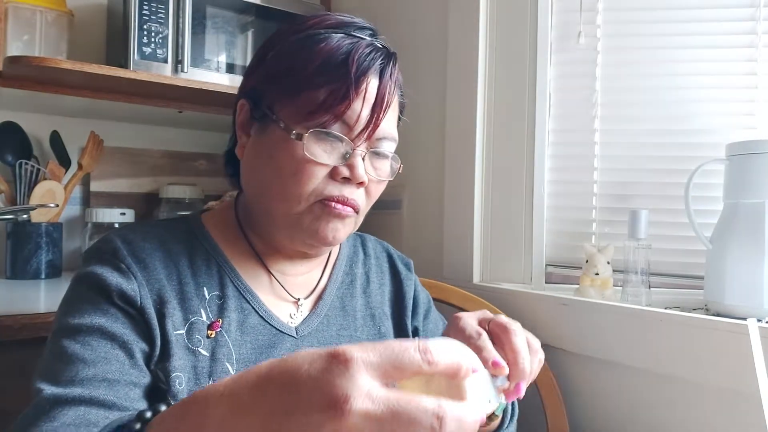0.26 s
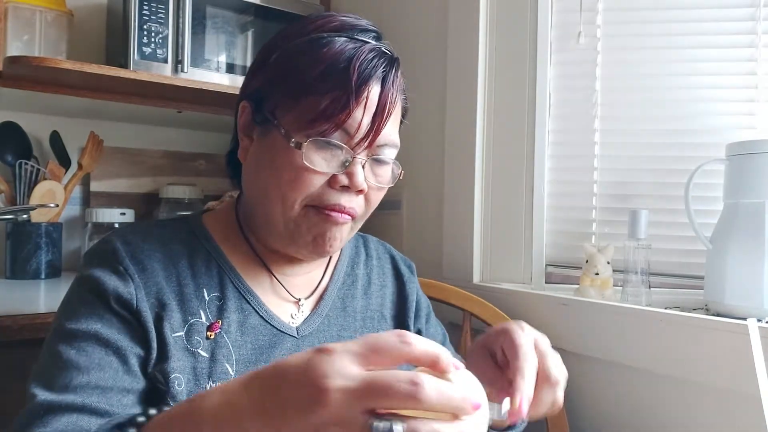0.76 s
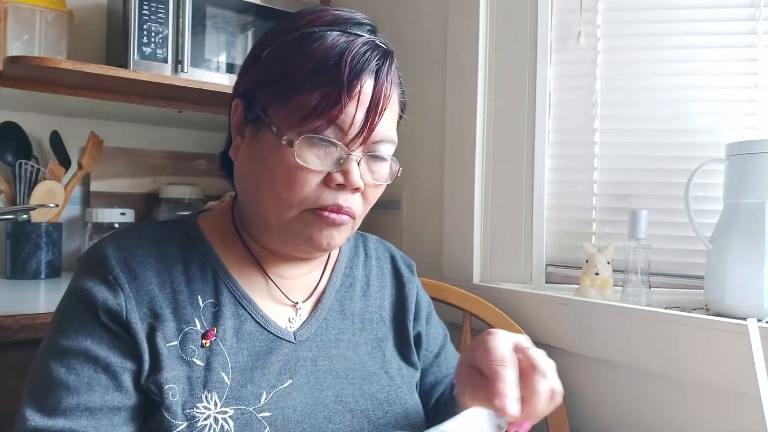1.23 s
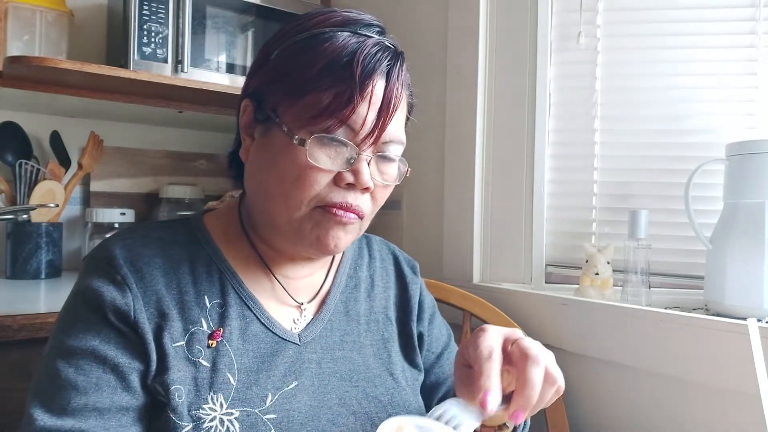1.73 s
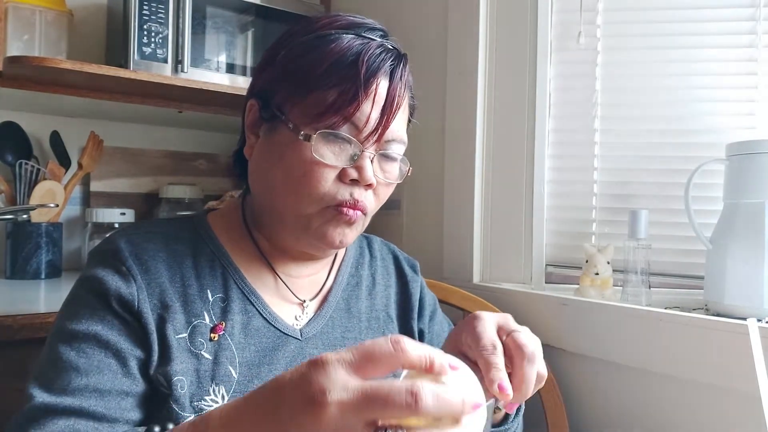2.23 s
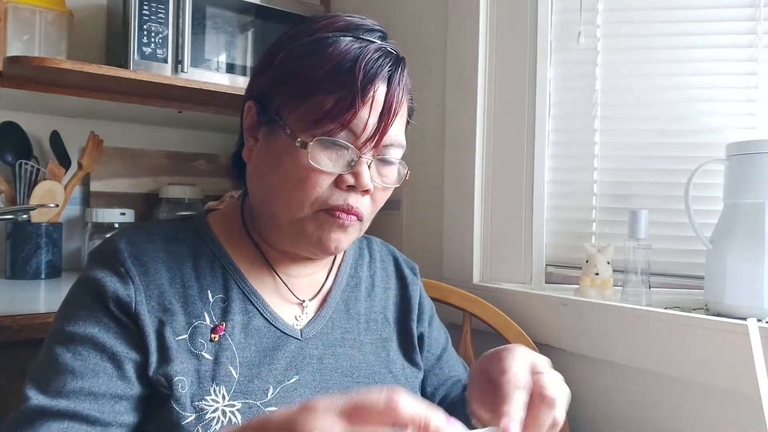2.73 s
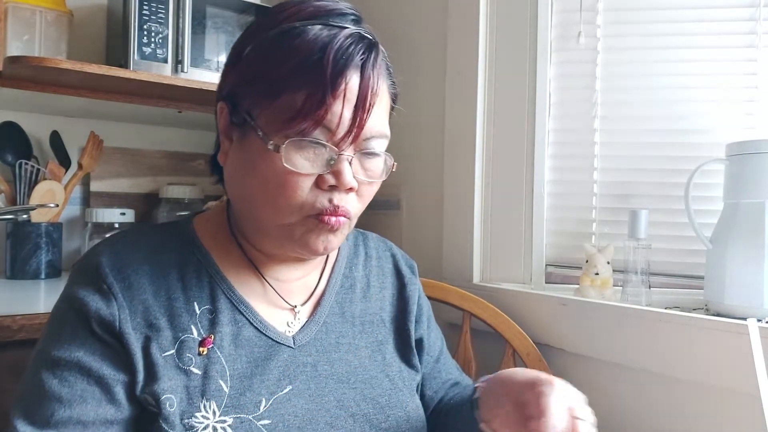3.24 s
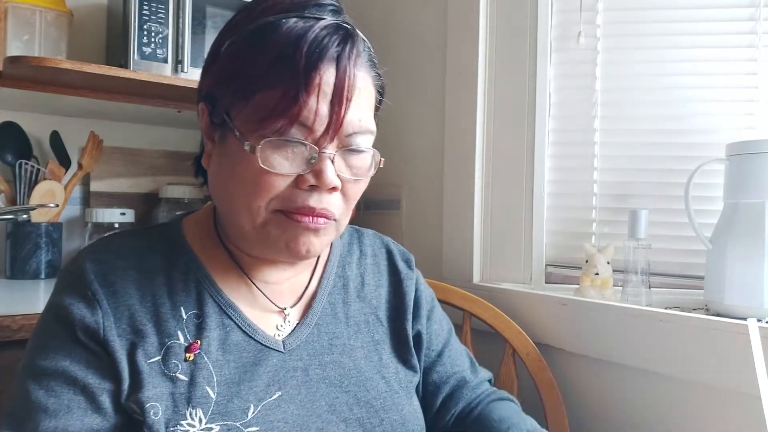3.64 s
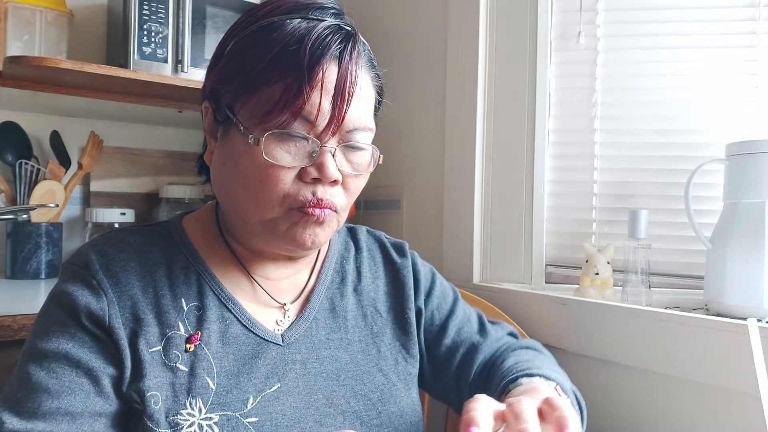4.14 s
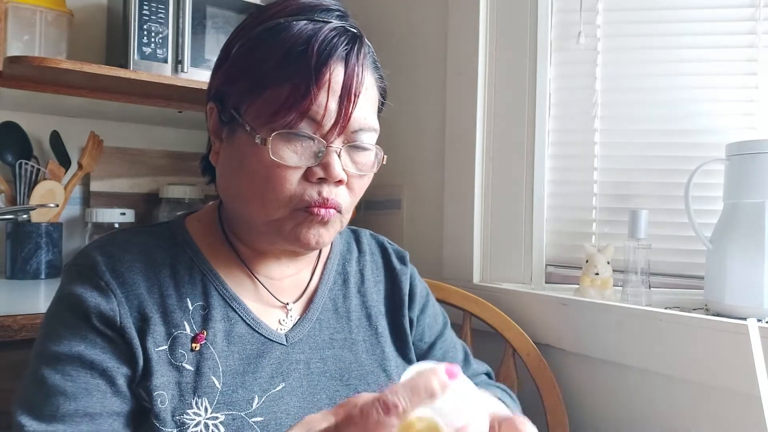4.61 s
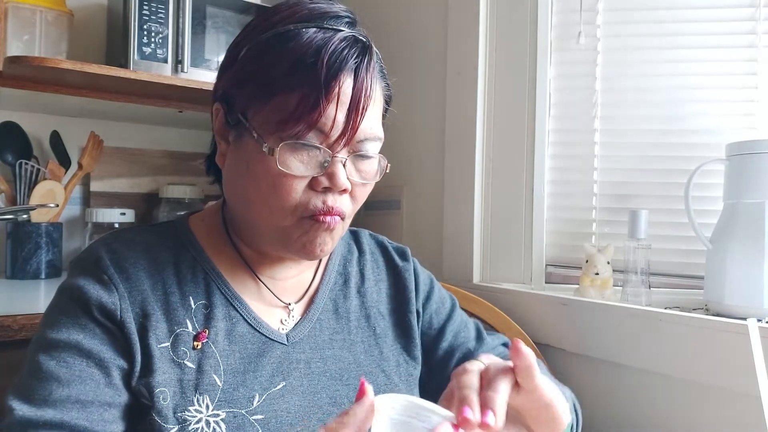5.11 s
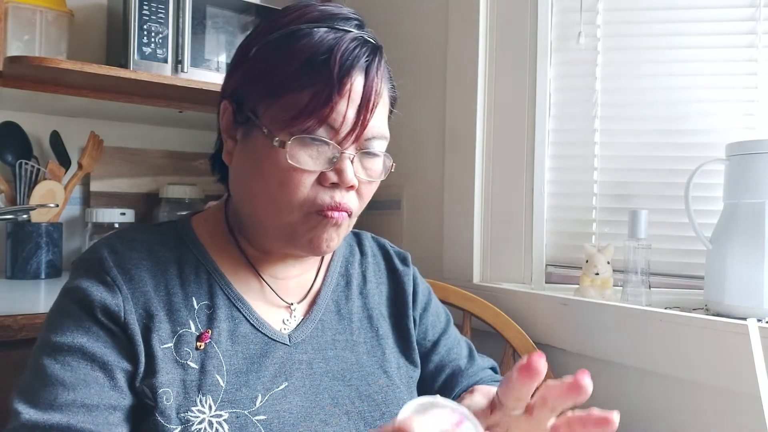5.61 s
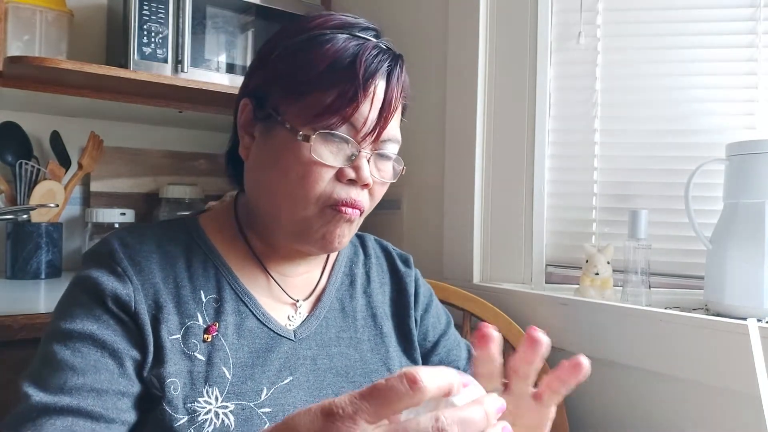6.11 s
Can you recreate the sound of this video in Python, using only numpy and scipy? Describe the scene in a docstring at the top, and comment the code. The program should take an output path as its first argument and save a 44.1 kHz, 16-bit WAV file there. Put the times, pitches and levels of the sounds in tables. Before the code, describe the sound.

Over a steady low room hum, fingertips scrape lightly on a plastic cup, its lid ticking now and then, with a barely audible bump on the table. The handling thins out before a fork is set down with a sudden hard clack, a second strike and a brief chattering rattle, leaving a short room echo. Quiet rubs and ticks follow, ending in closer, brisker plastic scuffs. Near microphones, indoors.

```python
"""A quiet kitchen: hands work at a small plastic cup. Fingertips rub and flex it (noise through moving
resonances), palms scuff it, the lid ticks (short decaying tones) and a hand bumps the table.
A steel fork is set down; it bounces, rattles and rings (noise cracks and dying modes).
A pair of microphones hears it with the kitchen's echo, over a low room hum with fuzzy tones."""
import sys
import numpy as np
from scipy import signal
from scipy.fft import rfft, irfft
from scipy.io import wavfile
from scipy.ndimage import uniform_filter1d

SR = 44100
rng = np.random.default_rng(int(sys.argv[2]) if len(sys.argv) > 2 else 0)


def store_pcm(level_fs):
    """Save levels as 16-bit WAV."""
    pcm = np.round(np.clip(level_fs, -1, 1) * 32767).astype(np.int16)
    wavfile.write(sys.argv[1], SR, np.atleast_2d(pcm).T)


N = 280608  # samples

# modes of the table top: f/Hz
TOP_HZ = [306, 382, 467, 504, 560, 609, 777, 1073, 1628]
# strength and decay of those modes: relative level/dB, t60/s
TOP_MODES = [(2, 0.11), (3, 0.13), (-1, 0.22), (-7, 0.055), (-4.5, .08), (-9, 0.024), (-3, 0.063),
             (-15, 0.07), (-10.5, 0.025)]
# spectrum of steel striking the table, relative: f/Hz, density/dB per Hz
CRACK_COLOUR = [(250, -26.5), (550, -8.5), (850, -7), (1150, -7.5), (1620, -2.5), (2100, -3), (2750, 0),
                (3100, -6.5), (3600, 1.5), (4300, -3), (5300, -4), (7200, -6), (9000, -14), (11500, -24),
                (14300, -8.5), (16000, -12)]


def rub():
    """Skin drags over plastic and shakes the resonances of the cup; the wall's pitch moves with the grip."""
    # fingertip strokes: start/s, rise/s, hold/s, fall/s, pressure/dB, rim/dB and dry fizz/dB
    # (both relative to pressure), wall f/Hz
    rubs = [(0.0, 0.0056, 0.0041, .1, -72, -26, -5.5, 2620),
            (0.071, 0.0018, 0.0024, .07, -63.5, 2, 4.5, 2300), (0.087, 0.036, .01, 0.42, -70, -7, -6, 2420),
            (0.141, 0.087, 0.11, 0.35, -72.5, -0.5, 5, 2520),
            (0.41, 0.043, 0.0069, 0.073, -63.5, -3, 4.5, 2510),
            (0.466, 0.034, 0.1, 0.16, -80, -2.5, 3.5, 2350),
            (1.431, 0.0018, 0.015, 0.2, -72, -0.5, 5, 2460), (1.45, 0.098, 0.016, 0.33, -64, -3, 3.5, 2430),
            (1.816, 0.018, 0.006, 0.032, -60.5, -3.5, -3, 2510),
            (1.843, 0.026, 0.039, 0.091, -66, -6, 1.5, 2520),
            (2.046, 0.0024, .005, 0.05, -67, -23, 1.5, 2500),
            (2.051, 0.061, 0.028, 0.079, -69.5, -0.5, 4, 2400),
            (2.196, 0.022, 0.019, 0.12, -70.5, 4.5, 9, 2300),
            (2.296, 0.03, 0.0079, 0.052, -63.5, -1, 8, 2360),
            (2.32, 0.053, 0.044, 0.12, -67.5, -1.5, -2.5, 2540),
            (2.427, 0.059, 0.021, 0.21, -63, -1, 1, 2370),
            (2.565, 0.065, 0.0086, .14, -76, 5.5, 10.5, 2310),
            (2.753, 0.041, 0.034, .1, -89.5, -1, 2, 2350), (3.275, 0.061, 0.018, 0.094, -82, -1, -3, 2620),
            (3.39, 0.0075, .01, 0.25, -93, 7, -9, 2450), (4.135, 0.054, 0.021, 0.33, -71.5, 3.5, 6.5, 2470),
            (4.257, 0.091, .09, .3, -73, -2.5, 4.5, 2530),
            (4.453, 0.074, 0.063, 0.53, -76, -2.5, 6.5, 2340),
            (4.741, 0.0089, 0.013, .1, -87.5, 2, 12, 2310), (4.77, 0.074, .02, 0.34, -86, 3, 19.5, 2150),
            (4.848, 0.07, 0.037, 0.18, -78, 3.5, 14.5, 2340),
            (4.951, 0.059, 0.14, 0.26, -81.5, 4.5, 18.5, 2400),
            (5.205, 0.057, 0.016, 0.22, -83, 9.5, 14, 2400), (5.31, 0.073, 0.052, .1, -85, 5.5, 11.5, 2370),
            (5.436, 0.03, 0.018, 0.24, -69, -0.5, 3.5, 2610),
            (5.468, 0.024, 0.01, 0.032, -55, -11.5, -8, 2420), (5.68, .004, .01, 0.085, -85.5, 1, 17, 2390),
            (5.764, 0.069, 0.033, 0.094, -59.5, -4, 0.5, 2430),
            (6.012, 0.0018, 0.023, 0.11, -84.5, 5, 17, 2330),
            (6.037, 0.056, 0.031, 0.092, -58, -4, -0.5, 2430),
            (6.083, 0.0051, 0.031, .03, -53, -9.5, -5, 2650), (6.321, .002, 0.02, .1, -57.5, -8, -2, 2710),
            (6.322, 0.038, .02, 0.082, -50.5, -3, -2.5, 2600)]
    # fixed resonances of the cup: f/Hz, width/Hz of each filter pass, level/dB, share (1 rim, 2 fizz)
    cup = [(4306, 930, 2.5, 1), (5300, 1100, 0, 1), (7220, 2780, -4.5, 2), (11130, 4100, 0, 2),
           (12100, 6300, -1.5, 2)]
    power = strokes(rubs)
    rim_db, fizz_db, wall_hz = np.transpose(rubs)[5:]
    pressure = spread(np.sqrt(power.sum(0)))
    rim = spread(np.sqrt(gain_of(2 * rim_db) @ power))
    fizz = spread(np.sqrt(gain_of(2 * fizz_db) @ power))
    shares = (pressure, rim, fizz)
    drag = slips(N, 4.55, hold=40)
    # overlapping strokes agree on a wall pitch, weighted by power
    wall = spread(wall_hz @ power / power.sum(0))
    body = -pressure * evened(resonate_twice(drag, wall, 690))
    for n, (hz, width, db, share) in enumerate(cup):
        polarity = (-1) ** n
        body += polarity * shares[share] * gain_of(db) * evened(resonate_twice(drag, hz, width))
    return body


def scuff():
    """Coarser slips sound the air held between palm and cup."""
    # duller strokes, pitched by how the hand closes over the cup:
    # start/s, rise/s, hold/s, fall/s, level/dB, hollow f/Hz
    scuffs = [(0.0, .01, .01, 0.068, -88, 800), (0.068, .003, .005, .07, -83, 1430),
              (0.088, 0.026, 0.012, .1, -78, 1280), (0.188, .12, 0.056, .2, -76.5, 1180),
              (0.413, 0.05, .07, 0.2, -72, 605), (1.322, .012, 0.022, 0.41, -69.5, 950),
              (1.484, 0.064, 0.06, 0.18, -74, 1650), (1.825, 0.011, 0.072, 0.14, -74, 1650),
              (2.126, .003, 0.017, 0.67, -71, 1660), (2.27, 0.077, 0.024, .3, -68, 1400),
              (2.4, 0.09, 0.077, 0.23, -71.5, 1830), (3.297, 0.026, 0.038, 0.13, -71, 920),
              (4.275, .1, .025, .12, -67.5, 1550), (4.4, 0.027, 0.19, 0.16, -78, 1510),
              (5.308, 0.03, 0.027, 0.19, -68, 1030), (5.461, 0.0081, 0.03, 0.11, -65, 1524),
              (5.773, .004, 0.0096, .08, -75, 1210), (5.778, 0.031, 0.033, 0.096, -66, 1410),
              (5.84, 0.012, 0.019, 0.017, -53, 1700), (6.024, 0.078, 0.0087, 0.04, -58, 1560),
              (6.112, .006, 0.018, 0.028, -59, 1820), (6.321, 0.0017, 0.015, 0.15, -64, 1450),
              (6.322, 0.036, .02, .1, -55.5, 1150)]
    power = strokes(scuffs)
    hz = spread(np.transpose(scuffs)[5] @ power / power.sum(0))
    hollow = resonate_twice(slips(N, 6.1, hold=90), hz, 820)
    return spread(np.sqrt(power.sum(0))) * evened(hollow)


def add_ticks(mix):
    """The lid ticks: a bright snap of tone and noise, with a longer knock."""
    # time/s, snap level/dB, snap f/Hz, knock level/dB, knock f/Hz, left-right difference/dB
    ticks = [(0.0748, -43, 7450, -61.5, 2070, -19), (0.122, -46.5, 2250, -75, 2100, 7),
             (0.139, -51.5, 9100, -85, 1960, -11), (0.4517, -48, 2440, -76, 2130, -3),
             (0.8067, -66, 11100, -97, 1500, 4), (1.4362, -58, 7800, -68, 990, -10),
             (1.8194, -60, 5900, -68, 1516, -10), (1.834, -47, 1796, -76, 1850, 3),
             (1.8473, -46, 4160, -63, 1950, -16), (2.0492, -56.5, 4970, -74, 1560, -26),
             (2.1281, -52, 4900, -52.5, 1797, -0.5), (2.22, -50, 7500, -75, 4800, 0),
             (2.3277, -45, 6470, -72, 4770, 0), (3.2776, -70, 4270, -69, 4350, -8),
             (3.4093, -79, 4200, -65, 4750, 0), (3.4458, -76, 4200, -57, 1140, -5),
             (4.521, -51, 2350, -62, 1580, -14), (4.7514, -70, 7010, -71.5, 5540, -2),
             (5.686, -57, 5970, -71, 1323, -3), (5.7744, -78.5, 2410, -53, 1210, -1),
             (5.783, -72, 2300, -70, 2240, 0), (5.8037, -60, 4700, -59, 2430, -5),
             (6.0136, -62, 6500, -65, 1545, -1), (6.0449, -53, 2280, -56, 1425, 0),
             (6.095, -54, 2700, -47, 1790, -1.5), (6.32, -47, 1710, -52, 1620, 2)]
    t = np.arange(2500) / SR
    for s, db, hz, knock_db, knock_hz, pan_db in ticks:
        puff = np.diff(rng.standard_normal(len(t)), prepend=0)  # treble-heavy noise
        snap = np.sin(2 * np.pi * hz * t) + 0.56 * puff
        snap *= gain_of(db - 60 * t / 0.0063)
        knock = gain_of(knock_db - 60 * t / 0.037) * np.sin(2 * np.pi * knock_hz * t)
        add(mix, s, snap + knock, pan_db)


def add_bumps(mix):
    """A hand bumps the table and sets the modes of its top ringing."""
    bumps = [(0.479, -64.5), (2.128, -68.5), (6.111, -69.5), (6.344, -59)]  # time/s, level/dB
    t = np.arange(SR // 4) / SR
    for s, db in bumps:
        modes = ring(TOP_HZ, TOP_MODES, t, rng.random((3, 20)), split_hz=3.1)
        add(mix, s, gain_of(db) * modes * np.minimum(t / 0.0023, 1))


def hands():
    """All strokes, lid ticks and bumps, with their bounce off the table top."""
    mix = np.zeros((2, N))
    add(mix, 0, rub() + scuff(), pan_db=-2.3)
    add_ticks(mix)
    add_bumps(mix)
    # the bounce travels 5 cm further, so the first dip falls at 3.4 kHz
    late = np.exp(-1j * np.pi * np.fft.rfftfreq(N, 1 / SR) / 3400)
    return irfft(rfft(mix) * (1 + 0.1 * late), N)


def crack(t, db, tilt_db):
    """Burst of spiky noise as steel strikes the table; the tilt in dB per octave sets its brightness."""
    puff = rng.standard_normal(len(t))
    puff *= abs(puff)  # a few hard contacts stand out
    colour = [(hz, level + tilt_db * np.log2(hz / 3000)) for hz, level in CRACK_COLOUR]
    return gain_of(db - 60 * t / 0.028) * evened(coloured(puff, colour))


def clack(t, ring_db):
    """The hard point of contact gives a few short tones."""
    tones = [(1603, 1.5, .03), (1154, -1.5, .03), (2050, -2.5, 0.0083)]  # f/Hz, level/dB relative to the steel ring, t60/s
    return sum(gain_of(ring_db + level - 60 * t / t60) * np.sin(2 * np.pi * hz * t)
               for hz, level, t60 in tones)


def table_knock(t, knock_db, luck):
    """The blow rings the table top; a softer knock is duller."""
    soft_tilt, hard_knock_db = .4, -32  # dB per octave for each dB under a hard knock
    octaves = np.log2(np.divide(TOP_HZ, TOP_HZ[0]))
    tilt = soft_tilt * min(knock_db - hard_knock_db, 0) * octaves
    felt = [(level + dull_db, t60) for (level, t60), dull_db in zip(TOP_MODES, tilt)]
    return gain_of(knock_db) * ring(TOP_HZ, felt, t, luck, split_hz=39) * np.minimum(t / 0.0069, 1)


def table_thump(t, thump_db):
    """The heavy top takes 12 ms to swell to its full motion while its low tone dies away."""
    swell = np.sin(np.pi / 2 * np.minimum(t / .012, 1)) ** 2
    return gain_of(thump_db - 60 * t / 0.13) * np.sin(2 * np.pi * 146 * t) * swell


def steel_ring(t, ring_db, free, rocking, luck):
    """Modes of the fork ring freely for a short time set for each blow, then are quickly choked."""
    steel_hz = [3456, 4597, 6015, 6663, 7663, 8043, 9807, 10360, 11262, 11642, 12200, 13259, 13983, 14268,
                14316, 15094]  # modes of the fork: f/Hz
    steel_modes = [(-14, 0.73), (-27.5, .2), (-35.5, 0.32), (-11, 0.041), (-10, 0.25), (-12, 0.053),
                   (-12.5, 0.23), (-22, 0.19), (-6, 0.45), (-10, 0.25), (-22.5, .2), (-8, 0.49), (-7, .2),
                   (-5, 0.94), (-2, 0.36), (-14.5, .15)]  # relative level/dB, unchoked t60/s
    choke_db = -60 * np.maximum(t - free, 0) / .035
    flutter_db = 4.9 * rocking
    return gain_of(ring_db + choke_db + flutter_db) * ring(steel_hz, steel_modes, t, luck, split_hz=47)


def add_rattle(mix):
    """Tiny contacts of the fork chatter in four bursts, each fading ever faster."""
    # start/s, length/s, level/dB, starting fade/dB per s, starting treble/dB
    rattles = [(3.583, 0.14, -61.5, 57.5, 1), (3.731, 0.04, -31, 259, -3),
               (3.789, 0.25, -29.5, 144.5, -0.5), (3.952, 0.25, -27.5, 134, -13.5)]
    hasten, brighten = 402.5, 55.5  # the fade speeds up (dB/s^2) and the last contacts are thinnest (dB/s)
    t = np.arange(SR // 5) / SR
    for s, length, db, fade_db, treble_db in rattles:
        chatter = evened(coloured(slips(len(t), 5.5, hold=30), CRACK_COLOUR))
        dull = uniform_filter1d(chatter, size=8)
        treble = gain_of(treble_db + brighten * t) * (chatter - dull)
        level = (t < length) * gain_of(db - fade_db * t - hasten * t ** 2)
        add(mix, s, level * (dull + treble))


def fork():
    """Each bounce cracks, knocks the table and rings the steel, with bursts of rattle among them."""
    # time/s, crack level/dB, crack brightness/dB per octave, table knock/dB, table thump/dB,
    # steel ring/dB, left-right difference/dB, free ring/s
    blows = [(3.588, -34.5, 4, -46.5, -53.5, -58, -12, 0.01),
             (3.606, -37.5, 2, -57, -42.5, -67.5, -10, 0.02),
             (3.629, -34.5, 1, -58, -41.5, -59.5, -4, 0.026),
             (3.641, -47.5, 1, -50, -58, -61.5, -3.5, 0.02),
             (3.67, -47, -3.5, -45.5, -54, -73.5, 0.5, 0.02),
             (3.734, -11, 3, -31, -47.5, -21.5, -5.5, 0.02), (3.79, -8.5, 7.5, -34, -46, -24.5, 4, 0.011),
             (3.814, -24.5, 2, -40.5, -61.5, -33.5, -18.5, 0.019),
             (3.826, -46.5, 1, -40.5, -76.5, -31.5, 11, 0.037),
             (3.85, -20.5, -2.5, -47, -57.5, -28.5, 1, 0.032),
             (3.876, -29, 5.5, -53, -50, -42.5, -9, 0.012),
             (3.954, -21, -3.5, -42.5, -52, -35.5, -2.5, 0.055),
             (3.978, -36, -12.5, -52, -78, -37, -5.5, 0.028), (3.99, -32.5, 1, -40.5, -40.5, -56, 8, 0.015),
             (4.025, -27.5, -6.5, -60, -44, -60, -4, 0.04), (4.058, -37.5, -6.5, -53.5, -67, -59, -3, 0.02)]
    mix, t = np.zeros((2, N)), np.arange(SR // 5) / SR
    # rocking on the wood makes the ring flutter
    rock = evened(uniform_filter1d(rng.standard_normal((len(blows), len(t))), size=300))
    for blow, rocking in zip(blows, rock):
        s, db, tilt_db, knock_db, thump_db, ring_db, pan_db, free = blow
        luck = rng.random((3, 20))  # where this blow lands
        add(mix, s, crack(t[:2048], db, tilt_db), pan_db)
        add(mix, s, clack(t, ring_db), pan_db)
        add(mix, s, table_knock(t, knock_db, luck))
        add(mix, s, table_thump(t, thump_db))
        add(mix, s, steel_ring(t, ring_db, free, rocking, luck), pan_db)
    add_rattle(mix)
    return mix


def kitchen(x):
    """Sparse echoes of random sign, each band dying at its own speed."""
    decay = [(250, 0.19), (1000, 0.29), (4000, 0.22), (9000, 0.23), (15000, 0.09)]  # f/Hz, t60/s
    taps = np.zeros((2, SR))
    # one echo at a random place in every 12 samples
    at = np.arange(200, SR - 12, 12) + rng.integers(0, 12, (2, (SR - 201) // 12))
    np.put_along_axis(taps, at, rng.choice([-1., 1.], at.shape), 1)
    hz, t, z = signal.stft(taps, SR, nperseg=256)
    fade = gain_of(-60 * t / read(decay, hz)[:, None])
    tail = signal.istft(alike(z, hz) * fade, SR, nperseg=256)[1]
    return signal.fftconvolve(x[None], tail / np.linalg.norm(tail[0]), axes=1)[:, :N]


def hum():
    """Steady room rumble and microphone hiss: shaped noise with faint drifting patches."""
    hum_colour = [(15, -44.5), (25, -17), (117, -2), (153, -13.5), (317, -7.5), (363, -13), (405, -15.5),
                  (796, -25), (1020, -22.5), (1400, -29), (1700, -30.5), (1840, -31.5), (2280, -32.5),
                  (5730, -44.5), (16000, -38)]  # relative spectrum: f/Hz, density/dB per Hz
    frames, hz = N // 256 + 5, np.fft.rfftfreq(1024, 1 / SR)
    a, b, c, d, patches = rng.standard_normal((frames, 513, 5)).T
    patches = uniform_filter1d(patches, size=6, axis=0)  # smooth over frequency
    patches = evened(uniform_filter1d(patches, size=20, axis=1))  # and over time
    colour = gain_of(read(hum_colour, hz)[:, None] + 0.58 * patches)
    z = alike([a + 1j * b, c + 1j * d], hz) * colour
    noise = signal.istft(z, nperseg=1024, noverlap=768)[1][:, :N]
    return gain_of(-67) * evened(noise)


def drone():
    """Fuzzy tones in the room hum: narrow wavering bands of noise, alike at both microphones."""
    tones = [(324.4, 7.9, -76), (108, 31, -81.5), (177, 16, -78)]  # f/Hz, width/Hz of each filter pass, level/dB
    noise = rng.standard_normal(N)
    return sum(gain_of(db) * evened(resonate_twice(noise, hz, width)) for hz, width, db in tones)


def strokes(rows):
    """Power of each stroke over time, 1000 values a second: touch, rise, hold, let go."""
    touch_db, let_go_db = -21.5, -44.5  # start, and level after the fall time, relative to the peak
    t = np.arange(0, N / SR, .001)
    least = [[[-1]], [[.001]], [[0]], [[.01]], [[-150]]]
    start, rise, hold, fall, db = np.maximum(np.transpose(rows)[:5, :, None], least)
    rising = np.clip(1 - (t - start) / rise, 0, 1)
    falling = np.maximum(t - start - rise - hold, 0) / fall
    return (t >= start) * gain_of(db + touch_db * rising + let_go_db * falling) ** 2 + 1e-30


def slips(count, spread_db, hold):
    """Noise whose size jumps as the contact sticks and slips."""
    size = uniform_filter1d(rng.exponential(1, count), size=hold)
    return rng.standard_normal(count) * gain_of(spread_db * evened(size - 1))


def resonate(x, hz, width):
    """One resonance at a pitch that may move: shifts hz down to zero, smooths, and shifts back."""
    turn = np.exp(2j * np.pi * np.cumsum(hz * np.ones(len(x))) / SR)
    r = np.exp(-np.pi * width / SR)
    return 2 * (turn * signal.lfilter([1 - r], [1, -r], x / turn)).real


def resonate_twice(x, hz, width):
    """Two passes through the same resonance give steeper skirts."""
    return resonate(resonate(x, hz, width), hz, width)


def ring(hz, modes, t, chance, split_hz):
    """Dying sines in close pairs that beat; where the blow lands sets each one's share and phase."""
    db, t60 = np.transpose(modes)[:, :, None]
    share, phase, split = chance[:, :len(modes), None]
    beat = 1 + 0.71 * np.exp(2j * np.pi * (split_hz * (2 * split - 1) * t + share + phase))
    wave = np.exp(2j * np.pi * (np.c_[hz] * t + phase)) * beat
    landing_db = 7 * (share - .5)
    return (gain_of(db + landing_db - 60 * t / t60) * wave.real).sum(0)


def alike(pair, hz):
    """Gives two channels the likeness of diffuse sound, greatest for long waves."""
    likeness = [(60, 0.83), (290, 0.79), (640, 0.12), (1400, 0.14), (15000, 0.29)]  # f/Hz, left-right likeness (0 to 1)
    same = np.clip(read(likeness, hz), 0, 1)[:, None]
    return np.array([pair[0], same * pair[0] + np.sqrt(1 - same ** 2) * pair[1]])


def coloured(x, points):
    """Shapes the spectrum of x by a table of gains in dB."""
    return irfft(rfft(x) * gain_of(read(points, np.fft.rfftfreq(len(x), 1 / SR))), len(x))


def read(points, hz):
    """Reads a table on a log-frequency axis."""
    f, value = np.transpose(points)
    return np.interp(np.log(hz + 1), np.log(f + 1), value)


def spread(curve):
    """From 1000 values a second to the sample rate."""
    return np.interp(np.arange(N) * 1000 / SR, np.arange(len(curve)), curve)


def gain_of(db):
    """Decibels to gain."""
    return 10 ** (np.asarray(db) / 20)


def evened(x):
    """Scales to rms 1."""
    return x / np.sqrt(np.mean(x ** 2) + 1e-20)


def add(mix, s, sound, pan_db=0):
    """Adds a sound to both channels at time s, the left pan_db above the right."""
    part = mix[:, round(s * SR):][:, :len(sound)]
    part += gain_of([[pan_db / 2], [-pan_db / 2]]) * sound[:part.shape[1]]


def scene():
    """Near sounds reach the right microphone first; the echoes follow, over hum and drone."""
    left_lag = 5  # samples
    plastic, steel = hands(), fork()
    near = plastic + steel
    left = np.append(np.zeros(left_lag), near[0, :-left_lag])
    near = np.array([left, near[1]])
    echoes = kitchen(gain_of(0.5) * plastic.mean(0) + gain_of(-1.0) * steel.mean(0))
    return near + echoes + hum() + drone()


def record(dry):
    """The small microphones lose the deepest bass, the loudest peaks are rounded, then the band limit."""
    thin = signal.sosfilt(signal.butter(2, 60, "high", fs=SR, output="sos"), dry)
    rounded = .85 * np.tanh(thin / .85)
    band_limit = signal.firwin(511, 16000, window=("kaiser", 9), fs=SR)  # low-pass at 16 kHz
    return signal.oaconvolve(rounded, band_limit[None], "same")


dry = scene()
out = record(dry)
store_pcm(out)
```